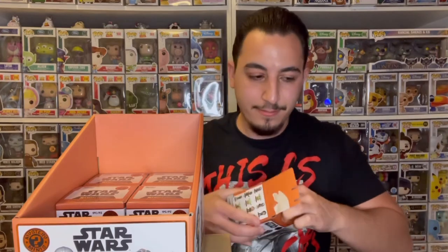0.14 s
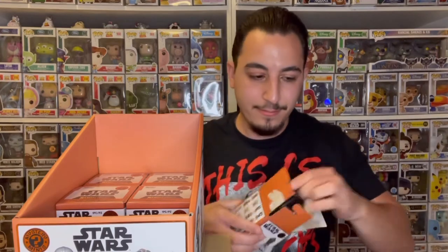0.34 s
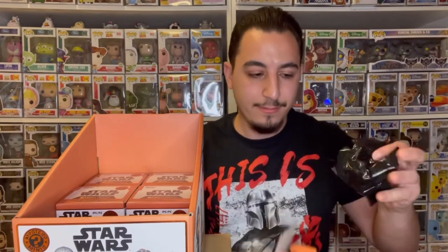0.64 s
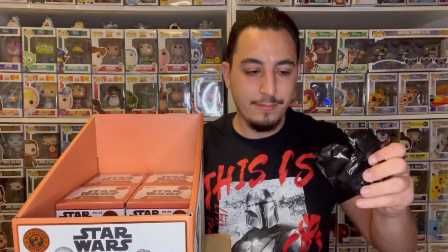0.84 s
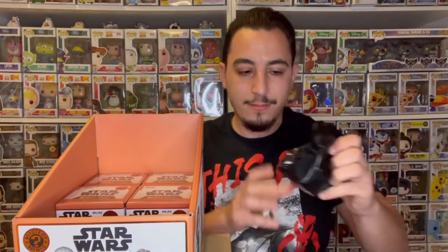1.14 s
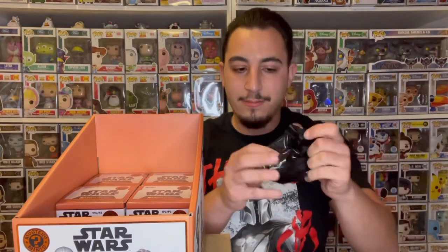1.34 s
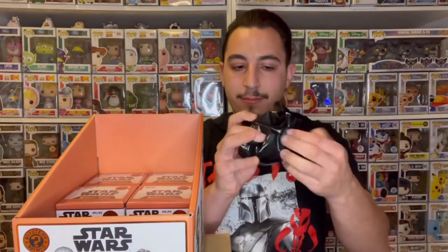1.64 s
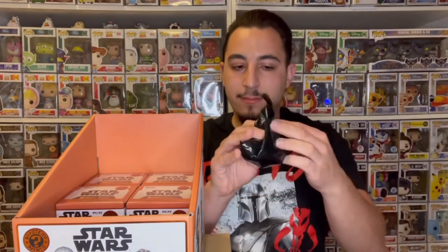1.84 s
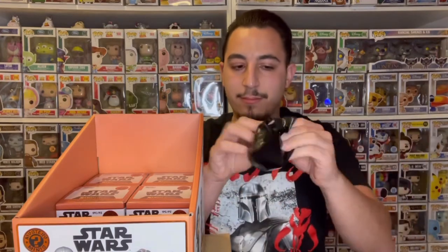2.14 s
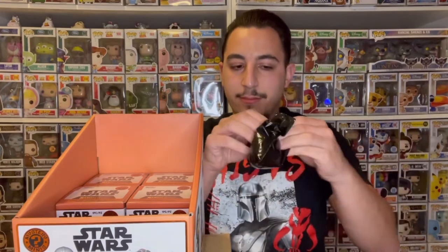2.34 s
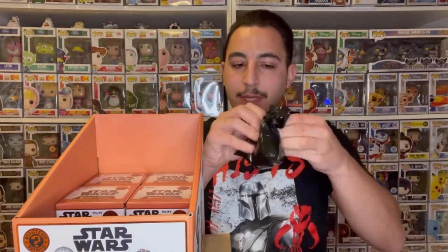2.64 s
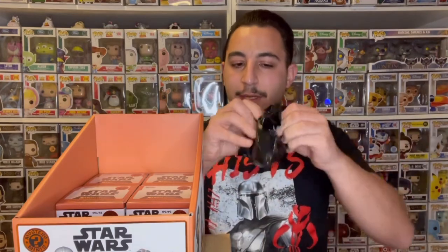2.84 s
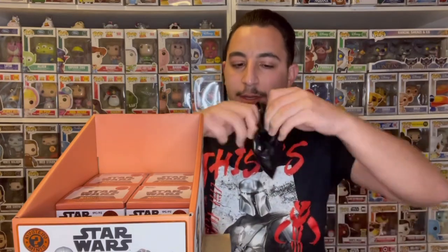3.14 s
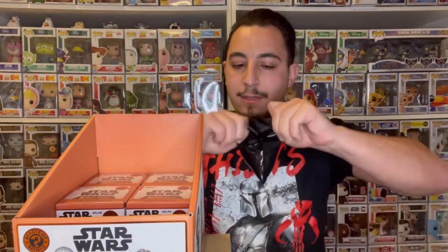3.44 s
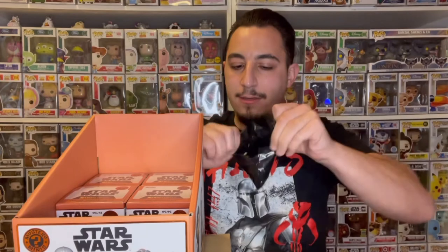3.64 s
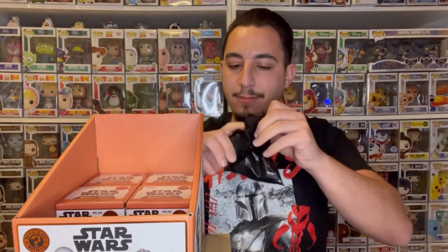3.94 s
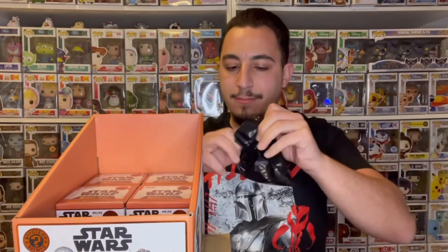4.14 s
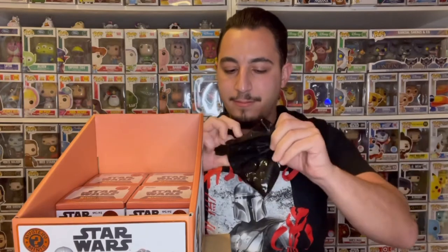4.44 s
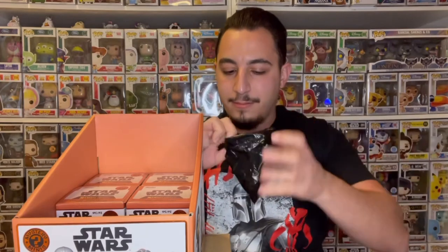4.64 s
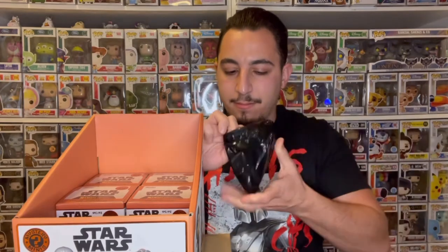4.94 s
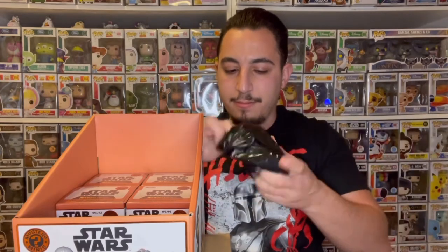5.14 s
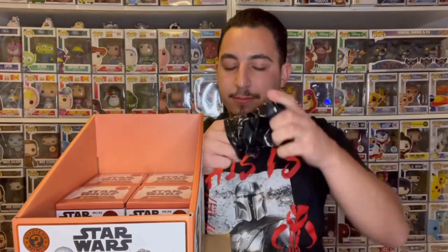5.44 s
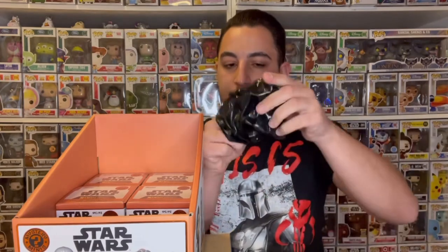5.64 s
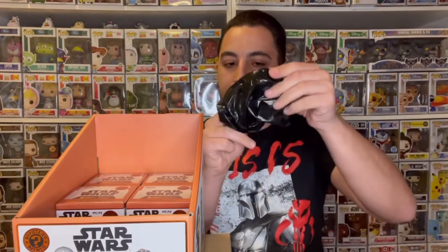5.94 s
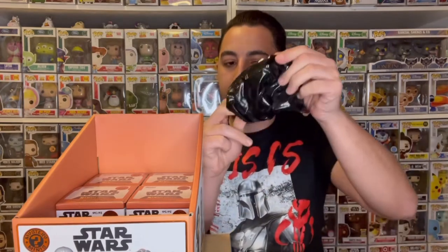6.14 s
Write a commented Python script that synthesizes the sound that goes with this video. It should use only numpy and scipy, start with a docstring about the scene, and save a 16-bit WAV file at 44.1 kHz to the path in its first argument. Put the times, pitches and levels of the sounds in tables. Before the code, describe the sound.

At the start, a small cardboard box scrapes against a foil bag as the bag is pulled out, and a flap pops at about 0.3 seconds. Around 0.6 seconds the box drops on a table, bounces and slides briefly with light, hollow knocks. From about 1 second, hands knead the bag in uneven clumps of crinkling, with many sharp single snaps and short, denser crunches as the foil is pulled. The strongest tugs and tears come between 3 and 4.1 seconds, with the loudest snaps near 3.4 and 4.1. The crackling then turns a little lighter, and the bag's slightly hollow ring rises in pitch around 5 seconds. The contents knock softly near 1.5, 2.9, 4.1 and 6.1 seconds. The crinkling dies away at about 6.3 seconds. The sound is in stereo, in a small furnished room with little echo and a faint rumble and hum.

```python
"""Unpacking a foil bag

Hands pull a foil bag out of a small cardboard box, drop the box on the table and knead the bag open.
Creases in the foil buckle in clumps of tiny snaps, with louder single snaps on top, and the air in the
bag rings hollow. The box rings when it is dragged or knocked. Two microphones close together hear it
all in a small furnished room."""
import sys
import numpy as np
from scipy import signal
from scipy.fft import rfft, irfft, next_fast_len
from scipy.io import wavfile
from scipy.ndimage import uniform_filter1d

SR = 44100
rng = np.random.default_rng(int(sys.argv[2]) if len(sys.argv) > 2 else 0)


def log_audio(samples):
    """Write samples as a 16-bit WAV file to the path given in sys.argv[1]."""
    # one column per channel
    frames = np.atleast_2d(samples).T
    # limit to full scale, then quantise
    limited = np.clip(frames, -1, 1)
    pcm = np.round(limited * 32767).astype(np.int16)
    wavfile.write(sys.argv[1], SR, pcm)


N = 277389
TIME = np.arange(N) / SR


def gain_of(db):
    return 10 ** (np.asarray(db) / 20)


def unit_rms(x):
    return x / np.sqrt(np.mean(x ** 2) + 1e-20)


def curve_at(points, hz):
    """Reads between (frequency, value) points on a log frequency scale."""
    f, value = np.transpose(points)
    return np.interp(np.log(hz + 1), np.log(f + 1), value)


def add_at(mix, start_s, sound):
    part = mix[..., round(start_s * SR):][..., :sound.shape[-1]]
    part += sound[..., :part.shape[-1]]


def filtered(x, gain):
    """Filters x by a function of frequency."""
    size = next_fast_len(x.shape[-1] + 4096)
    return irfft(rfft(x, size) * gain(np.fft.rfftfreq(size, 1 / SR)), size)[..., :x.shape[-1]]


# The tone of the room's steady noise: f/Hz, relative level/dB
ROOM_NOISE = [(25, -7), (50, 2.5), (130, 4), (500, -4.5), (1100, -20), (8000, -17), (16000, -60)]
# The notes of the mains hum: f/Hz, level/dB
MAINS_HUM = [(120, -69), (240, -64.5)]
def room_tone(noise_db=-57):
    """A soft rumble and hiss, partly alike at both microphones, with a faint mains hum."""
    noise = rng.standard_normal((3, N))
    rumble = unit_rms(filtered(0.56 * noise[:2] + noise[2], lambda hz: gain_of(curve_at(ROOM_NOISE, hz))))
    hum = sum(gain_of(db) * np.sqrt(2) * np.sin(2 * np.pi * hz * TIME) for hz, db in MAINS_HUM)
    return gain_of(noise_db) * rumble + hum


# How long the room rings: f/Hz, time to fade by 60 dB/s
ECHO_FADE = [(150, 0.33), (700, 0.12), (2000, 0.15), (6000, 0.14), (14000, 0.0034)]
def room_echoes(x, turns_per_s=7):
    """Three sets of echoes take turns, so the room sounds smooth, without a fixed ringing colour."""
    taps = np.zeros((6, SR // 2))
    delays = np.arange(220, SR // 2 - 20, 20) + rng.integers(0, 20, (6, (SR // 2 - 221) // 20))
    np.put_along_axis(taps, delays, rng.choice([-1., 1.], delays.shape), 1)
    hz, t, bands = signal.stft(taps, SR, nperseg=128)
    fade = gain_of(-60 * t / curve_at(ECHO_FADE, hz)[:, None])
    tails = signal.istft(bands * fade, SR, nperseg=128)[1].reshape(3, 2, -1)
    tails = (tails + 0.31 * tails[:, ::-1]) / np.linalg.norm(tails[0, 0])  # left and right mix a little
    turns = np.cos(2 * np.pi * (turns_per_s * TIME + np.arange(3)[:, None] / 3)) * np.sqrt(2 / 3)
    return signal.fftconvolve((x * turns)[:, None], tails, axes=2).sum(0)[:, :N]


# The notes the box rings at, low to high: f/Hz, relative level/dB, time to fade by 60 dB/s
BOX_NOTES = [(93, -2.5, 0.046), (160, -2.5, 0.045), (304, 4.5, 0.019), (398, 5, 0.017), (638, 3, 0.024),
             (830, -2, 0.057), (1036, 10.5, 0.013), (2127, 4.5, 0.024)]
# The box drags along the foil, then the table: t/s, length/s, level/dB, share of upper notes (0-1)
DRAGS = [(0.038, 0.011, -39.5, 1), (0.105, 0.15, -41.5, 0.93), (0.544, 0.11, -40, 0.31),
         (0.68, 0.059, -47.5, 0.67)]
def box_drags(swell_db=2.5, release_db_per_s=400):
    """Uneven slips ring the open box. Each drag swells a little, then lifts off."""
    t = np.arange(3000) / SR
    slips = rng.standard_normal(N)
    slips *= gain_of(5.6 * unit_rms(uniform_filter1d(rng.standard_normal(N), 200)))
    notes = [gain_of(db - 60 * t / fade_s) * np.sin(2 * np.pi * hz * t) for hz, db, fade_s in BOX_NOTES]
    low = unit_rms(signal.oaconvolve(slips, sum(notes[:4]))[:N])
    high = unit_rms(signal.oaconvolve(slips, sum(notes[4:]))[:N])
    out = np.zeros(N)
    for start, length, db, share in DRAGS:
        age = TIME - start
        drop_db = swell_db * np.clip(1 - age / length, 0, 1)
        drop_db += release_db_per_s * np.maximum(age - length, 0)
        out += (age >= 0) * gain_of(db - drop_db) * (share * high + (1 - share) * low)
    return out


# A flap pops, the box lands and bounces, later the bag's contents knock: t/s, peak level/dB, panel f/Hz
BLOWS = [(0.261, -22, 880), (0.535, -26.5, 606), (0.571, -16, 322), (0.591, -30, 140), (0.696, -26, 246),
         (0.753, -34, 169), (1.512, -30, 318), (2.906, -28.5, 820), (4.087, -26.5, 256), (6.089, -31, 200),
         (6.247, -40.5, 766)]
def box_knocks(reach_octaves=0.98):
    """A soft blow rings the cardboard notes that lie near the pitch of the struck panel."""
    out, t = np.zeros(N), np.arange(6000) / SR
    for start, peak_db, panel_hz in BLOWS:
        ring = np.zeros(len(t))
        for hz, db, fade_s in BOX_NOTES:
            nearness = np.exp(-(np.log2(hz / panel_hz) / reach_octaves) ** 2)
            envelope = (1 - np.exp(-t * hz / 0.97)) * gain_of(db - 60 * t / fade_s)
            ring += nearness * envelope * np.sin(2 * np.pi * hz * rng.uniform(.96, 1.04) * t)
        add_at(out, start, gain_of(peak_db) * ring / abs(ring).max())
    return out


# The pitch of the air in the bag, mostly rising as the bag opens: t/s, f/Hz
BAG_PITCH = [(1.2, 880), (1.4, 1033), (4.1, 1144), (4.85, 1080), (5.15, 1590), (6.29, 1440)]
# The notes of that air: multiple of the pitch, width/Hz, level/dB
BAG_NOTES = [(.54, 130, -9.5), (1.001, 160, -6.5)]
def with_bag_air(foil):
    """The foil's sound plus the hollow ring it stirs up inside the bag."""
    cycles = np.cumsum(np.interp(TIME, *np.transpose(BAG_PITCH))) / SR
    out = foil.copy()
    for multiple, width_hz, db in BAG_NOTES:
        # Shift the gliding note down to 0 Hz, smooth it there, and shift it back.
        glide = np.exp(2j * np.pi * multiple * cycles)
        decay = np.exp(-np.pi * width_hz / SR)
        ring = glide * signal.lfilter([1 - decay], [1, -decay], foil / glide)
        out += gain_of(db) * 2 * ring.real
    return out


# The tone of foil and microphone together: f/Hz, relative level/dB
FOIL_TONE = [(60, -23), (200, 4), (440, 1), (570, -9), (800, -1), (1100, -2.5), (2300, -1), (4600, -1.5),
             (8500, -0.5), (11700, -5), (15600, -3), (16200, -44)]
def foil_filter():
    """Gives snaps the foil's tone. It rings only after a click (minimum phase), so clicks stay sharp."""
    log_gain = np.log(gain_of(curve_at(FOIL_TONE, abs(np.fft.fftfreq(4096, 1 / SR)))))
    return np.fft.ifft(np.exp(np.conj(signal.hilbert(log_gain)))).real[None, :2048]


def snap(hz, noise, rattle_ms, q, tick_gain):
    """One crease buckles: a crisp tick, then a rattle of slips rings the patch of foil next to it."""
    age = np.arange(noise.shape[1]) / SR * 1000 / np.clip(rattle_ms, .4, 8)
    # Both microphones hear noise[0]; each also has noise of its own, most of all around 4 kHz.
    own = 0.31 * noise[1:] + 1.03 * signal.lfilter(*signal.iirpeak(4000, 1.3, SR), noise[1:])
    rattle = (noise[0] + own) * np.exp(-age) * (1 - np.exp(-age / 0.79))
    ring = signal.lfilter(*signal.iirpeak(min(hz, 15000), q, SR), rattle)
    tick = signal.lfilter(*signal.butter(1, hz / 3, "high", fs=SR), rattle * np.exp(-1.5 * age))
    return ring / np.linalg.norm(ring) + tick_gain * tick / np.linalg.norm(tick)


def tiny_snaps(per_s, spread_db, longest_ms, patches=40):
    """Foil patches of all sizes snap at random. Returns the sound below and above 3 kHz."""
    strength = gain_of(spread_db * np.minimum(rng.exponential(1, N), 3))
    hits = strength * (rng.random(N) < per_s / SR)
    patch = rng.integers(0, patches, N)
    noise = rng.standard_normal((patches, 3, 500))
    ringing = rng.uniform(0.58, 1, patches)
    stream = np.zeros((2, N))
    for k, hz in enumerate(np.geomspace(550, 12000, patches)):
        sound = snap(hz, noise[k], longest_ms * ringing[k], q=2.6 * ringing[k], tick_gain=0.79)
        stream += signal.oaconvolve((hits * (patch == k))[None], sound, axes=1)[:, :N]
    stream = unit_rms(signal.oaconvolve(stream, foil_filter(), axes=1)[:, :N])
    low = signal.lfilter(*signal.butter(2, 3000, fs=SR), stream)
    return low, stream - low


# How loudly the kneaded foil crackles: t/s, level/dB
KNEADING = [(0, -39), (.25, -43), (.48, -46.5), (1, -49), (1.33, -39), (1.86, -39), (2.2, -46.5),
            (2.6, -40), (3.1, -41.5), (3.74, -47.5), (4.04, -35), (4.27, -54.5), (4.45, -39.5),
            (4.72, -48.5), (4.87, -41.5), (5.2, -38), (5.65, -46.5), (5.96, -44.5), (6.15, -49.5),
            (6.29, -67)]
# Firm pulls and tears: t/s, length/s, level/dB, change above 3 kHz/dB
FIRM_PULLS = [(0.13, 0.11, -38.5, 0.5), (0.376, 0.042, -32, -7.5), (0.663, 0.09, -36.5, -8),
              (1.072, 0.126, -27.5, -3.5), (1.395, 0.022, -27, -1.5), (1.461, 0.13, -32.5, -9),
              (1.593, 0.052, -37.5, -1.5), (1.93, 0.063, -34, -3), (2.346, 0.039, -30.5, -1),
              (2.399, 0.036, -31, -5.5), (2.436, 0.13, -36, -5), (2.622, 0.1, -40, -5),
              (3.008, 0.089, -36, 0.5), (3.168, 0.1, -31.5, 0.5), (3.377, 0.059, -28.5, -2.5),
              (3.538, 0.089, -36.5, -5.5), (3.633, 0.036, -29.5, -2.5), (3.756, 0.096, -39.5, -7),
              (4.068, 0.072, -31, -1), (4.183, 0.061, -38, -1), (4.501, 0.12, -37, -5.5),
              (4.972, 0.05, -36.5, -6), (5.383, 0.024, -28, -11), (5.488, .11, -39.5, -8.5),
              (5.769, 0.072, -32.5, -6), (5.944, 0.14, -41.5, -10.5), (6.066, 0.036, -30, -5.5)]
def foil_crackle(clump_s=0.0076, grip_s=0.027, let_go_s=0.0051):
    """Light kneading is sparse, clumped and dull; firm pulls are a denser, more even crunch."""
    width = int(clump_s * SR)
    clumps = unit_rms(uniform_filter1d(uniform_filter1d(rng.standard_normal(N), width), width))
    knead_db = np.interp(TIME, *np.transpose(KNEADING)) + 2.5 * clumps
    dulling_db = 0.25 * (knead_db + 16.5)  # softer kneading has less treble
    low, high = tiny_snaps(per_s=420, spread_db=4.1, longest_ms=2.53)
    out = gain_of(knead_db) * (low + gain_of(dulling_db) * high)
    low, high = tiny_snaps(per_s=900, spread_db=3.9, longest_ms=1.59)
    for start, length, db, treble_db in FIRM_PULLS:
        grip = np.clip((TIME - start) / grip_s, 0, 1)
        let_go = np.exp(-np.maximum(TIME - start - length, 0) / let_go_s)
        out += grip * let_go * gain_of(db + 2.0 * clumps) * (low + gain_of(treble_db) * high)
    return out


# Single snaps that stand out of the crackle: t/s, peak level/dB, ringing f/Hz
LOUD_SNAPS = [(0.163, -17, 1360), (0.261, -20, 2240), (0.32, -21, 1200), (0.34, -22, 8200),
              (0.36, -22, 1240), (0.378, -26, 5340), (0.499, -29.5, 2700), (0.56, -18, 940),
              (0.613, -25.5, 3450), (0.749, -23, 990), (0.813, -21.5, 2100), (0.836, -20.5, 2070),
              (0.897, -19.5, 1890), (0.975, -24.5, 2980), (1.017, -22, 1230), (1.091, -16.5, 1370),
              (1.141, -11, 6470), (1.197, -26, 3000), (1.226, -20, 950), (1.268, -20, 2970),
              (1.282, -15, 7300), (1.333, -19, 910), (1.378, -24, 5500), (1.405, -15, 3900),
              (1.458, -40, 5000), (1.478, -15.5, 4360), (1.485, -11.5, 7900), (1.517, -19, 2980),
              (1.591, -19.5, 4070), (1.66, -22.5, 950), (1.695, -45, 940), (1.729, -22.5, 1600),
              (1.75, -19.5, 4230), (1.804, -15, 1780), (1.83, -15.5, 3580), (1.854, -21, 1180),
              (1.937, -19.5, 1190), (1.946, -17.5, 6000), (2.043, -17, 1840), (2.15, -17.5, 1620),
              (2.221, -26, 2380), (2.269, -22.5, 2340), (2.37, -30, 1030), (2.453, -18, 800),
              (2.491, -19, 1070), (2.523, -14.5, 2350), (2.568, -18.5, 6960), (2.645, -26, 1190),
              (2.662, -20.5, 3000), (2.728, -12.5, 4500), (2.827, -21, 4570), (2.837, -17.5, 1110),
              (2.933, -16, 4030), (2.968, -20.5, 4520), (3.006, -18, 1620), (3.054, -17, 1150),
              (3.078, -16.5, 1070), (3.121, -21, 1930), (3.167, -21, 3660), (3.195, -12, 2460),
              (3.204, -22, 4470), (3.364, -22, 6200), (3.382, -7, 5270), (3.402, -17, 950),
              (3.433, -19, 3000), (3.446, -11, 1460), (3.558, -17.5, 2660), (3.648, -19, 1100),
              (3.891, -22.5, 2040), (3.961, -21.5, 3600), (3.995, -21, 1190), (4.008, -14.5, 1040),
              (4.088, -8, 1900), (4.161, -20.5, 2370), (4.217, -26, 2500), (4.349, -26, 2140),
              (4.384, -23.5, 2330), (4.451, -24, 2600), (4.522, -21.5, 2050), (4.838, -25, 1210),
              (4.996, -15, 2140), (5.025, -27, 2470), (5.085, -21.5, 1470), (5.175, -22.5, 1400),
              (5.23, -26, 5800), (5.289, -26, 4000), (5.304, -22.5, 1490), (5.315, -23, 2500),
              (5.373, -22.5, 910), (5.502, -26, 4120), (5.56, -20.5, 1560), (5.606, -27, 1510),
              (5.715, -24, 1000), (5.754, -22, 1520), (5.794, -30, 1560), (5.814, -13, 2980),
              (5.833, -19, 1520), (5.968, -21, 730), (5.982, -30, 800), (6.044, -19.5, 1420),
              (6.08, -21, 1510)]
def loud_snaps():
    """Each snap rings its own patch of foil; large, low patches rattle longer."""
    out, tone = np.zeros((2, N)), foil_filter()
    for start, peak_db, hz in LOUD_SNAPS:
        rattle_ms = 2.18 * (1500 / hz) ** 0.21
        sound = snap(hz, rng.standard_normal((3, 1200)), rattle_ms, q=2.37, tick_gain=1.35)
        sound = signal.fftconvolve(sound, tone, axes=1)
        add_at(out, start, gain_of(peak_db) * sound / abs(sound).max())
    return out


# How far the wave at the left microphone is ahead of the right: f/Hz, phase/radians
LEFT_LEAD = [(0, 0), (1640, .2), (2580, .9), (4740, 1.2), (6890, .1), (8440, -.9), (10400, -2.7),
             (12900, -3.6), (16500, -6.4)]
def scene():
    """Foil and box reach the two microphones slightly out of step, with the room around them."""
    hands = with_bag_air(foil_crackle() + loud_snaps()) + box_knocks() + box_drags()
    hands = signal.lfilter(*signal.butter(2, 70, "high", fs=SR), hands)  # the hands' sounds are heard with little deep bass below about 70 Hz
    sides = np.array([[1], [-1]])
    direct = filtered(hands, lambda hz: np.exp(.5j * curve_at(LEFT_LEAD, hz) * sides))
    return direct + gain_of(-10.5) * room_echoes(hands.mean(0)) + room_tone()


def record(dry, top_hz=16900):
    """The level falls at the very end, and the highest treble is cut off."""
    faded = dry * gain_of(np.interp(TIME, [6.15, 6.29], [0, -9]))
    low_pass = signal.firwin(511, top_hz, window=("kaiser", 9), fs=SR)
    return signal.oaconvolve(faded, low_pass[None], "same", axes=1)


dry = scene()
out = record(dry)
log_audio(out)
```